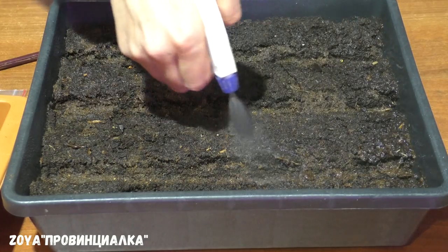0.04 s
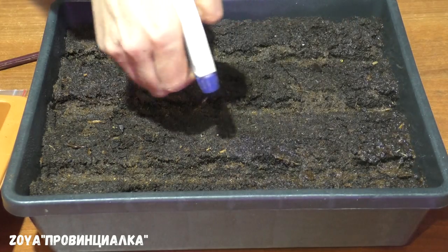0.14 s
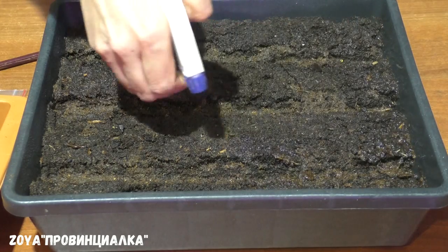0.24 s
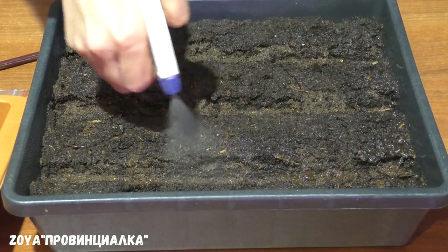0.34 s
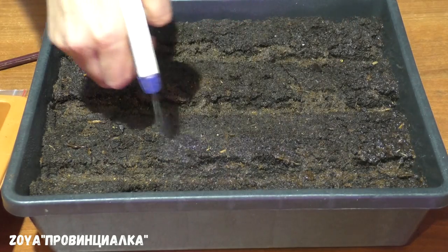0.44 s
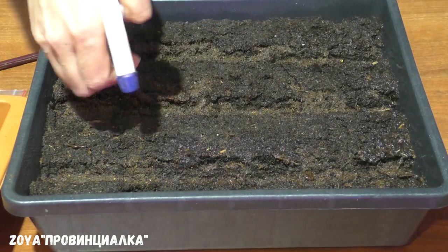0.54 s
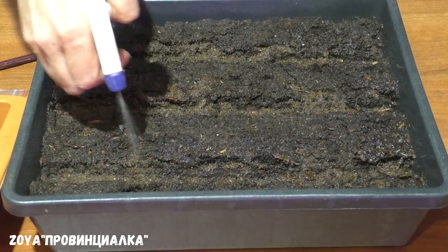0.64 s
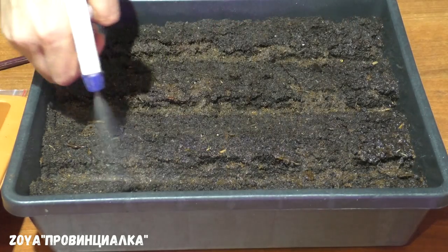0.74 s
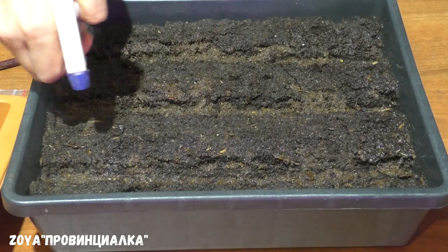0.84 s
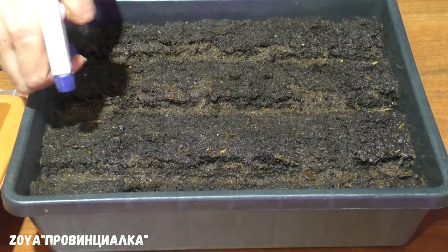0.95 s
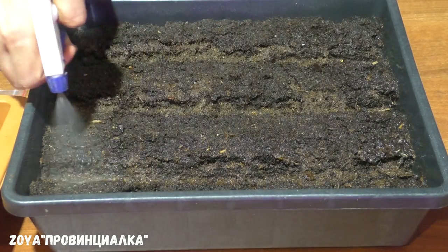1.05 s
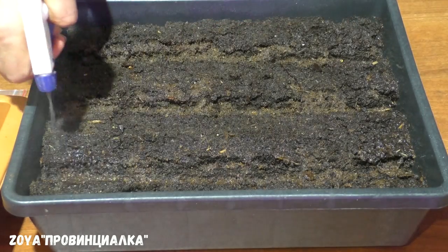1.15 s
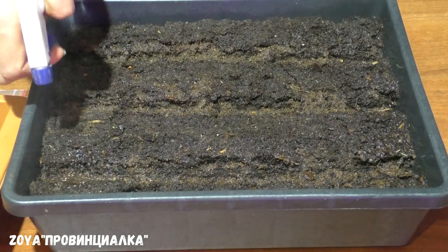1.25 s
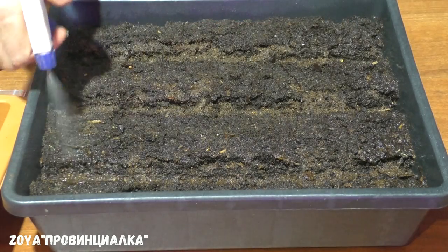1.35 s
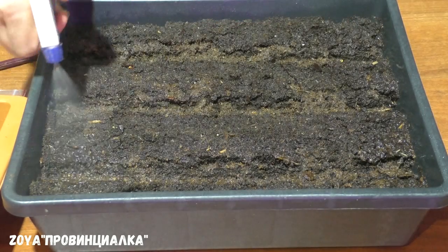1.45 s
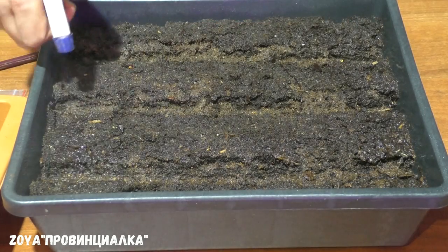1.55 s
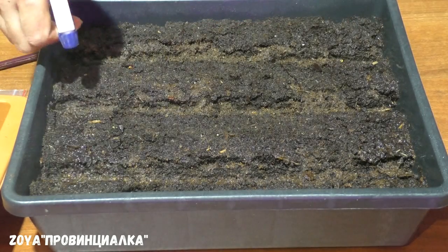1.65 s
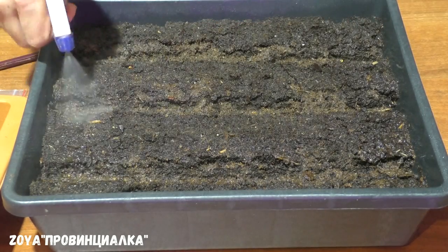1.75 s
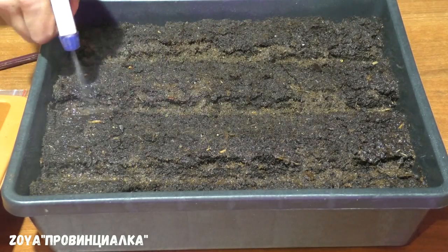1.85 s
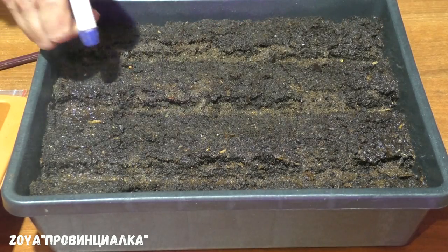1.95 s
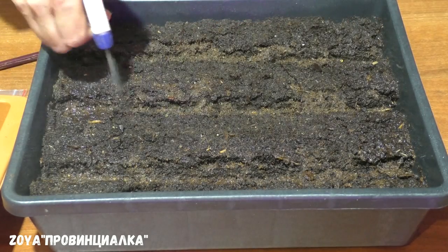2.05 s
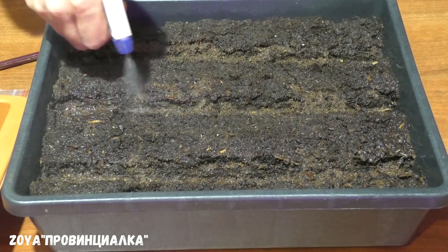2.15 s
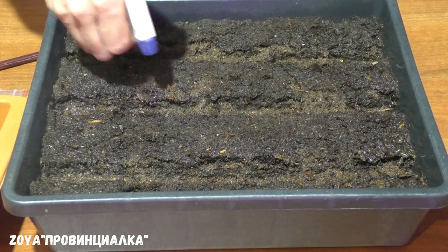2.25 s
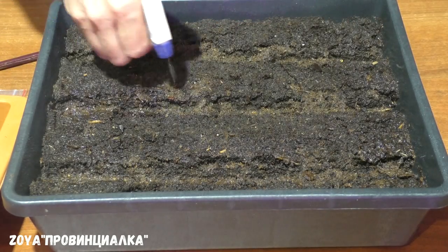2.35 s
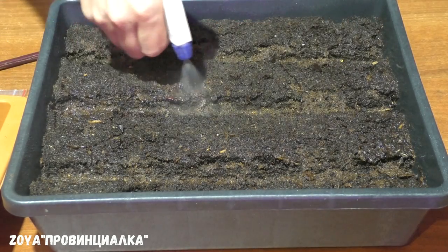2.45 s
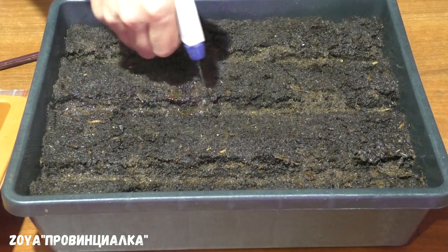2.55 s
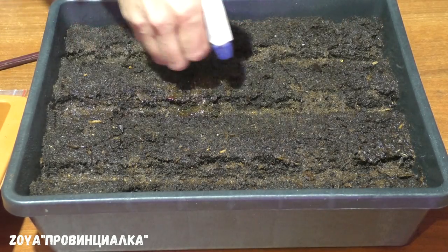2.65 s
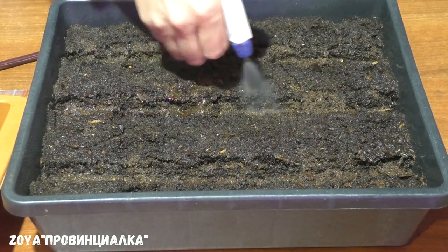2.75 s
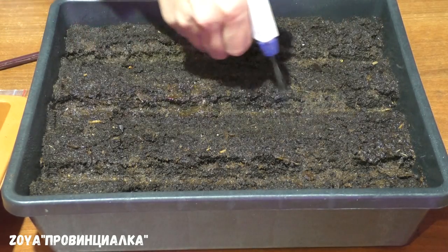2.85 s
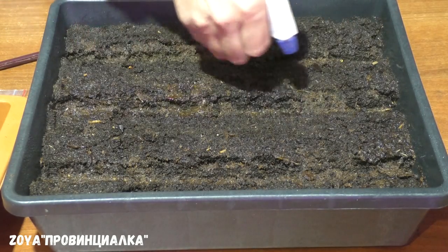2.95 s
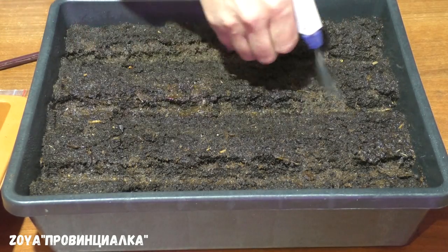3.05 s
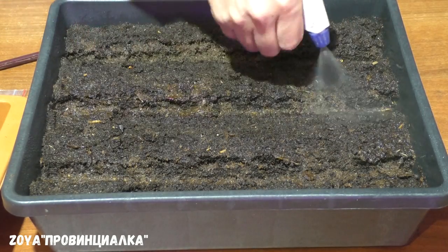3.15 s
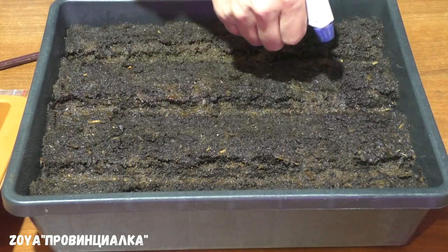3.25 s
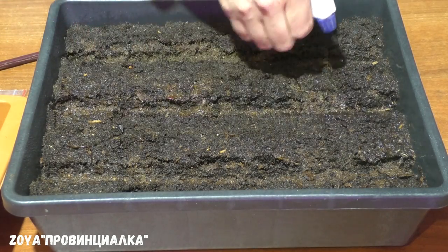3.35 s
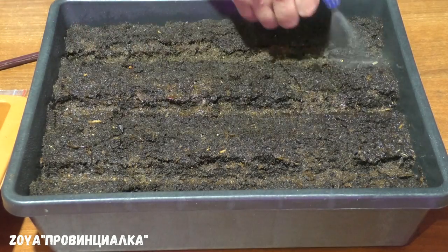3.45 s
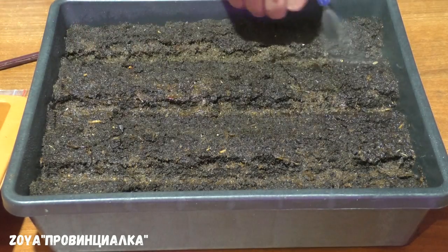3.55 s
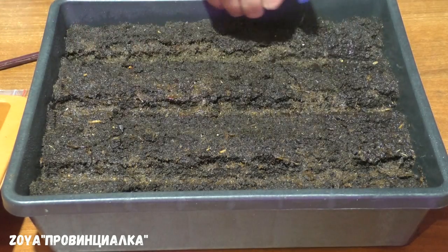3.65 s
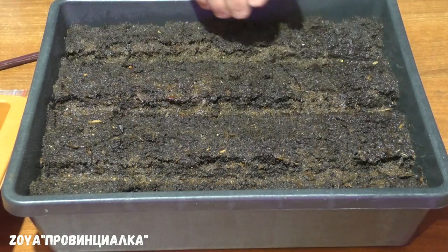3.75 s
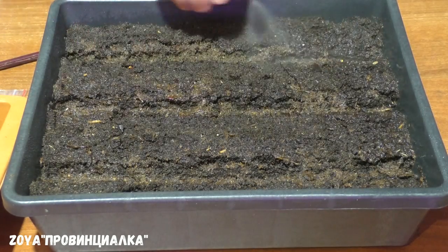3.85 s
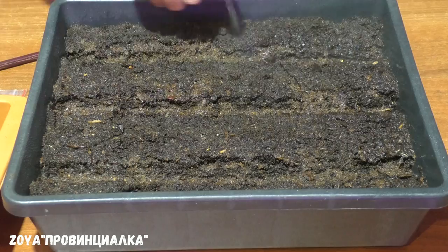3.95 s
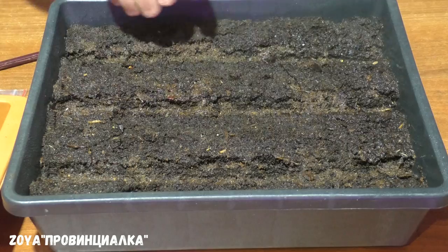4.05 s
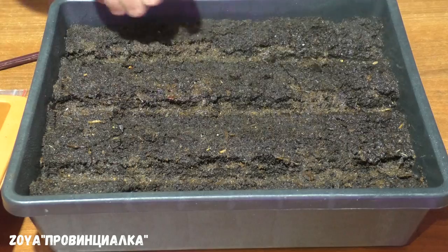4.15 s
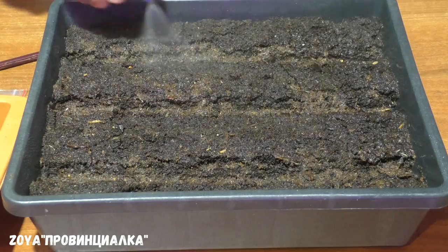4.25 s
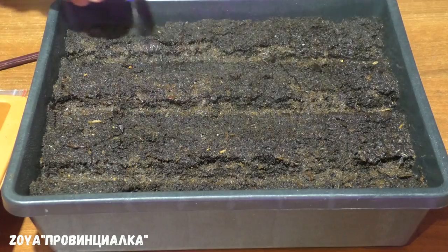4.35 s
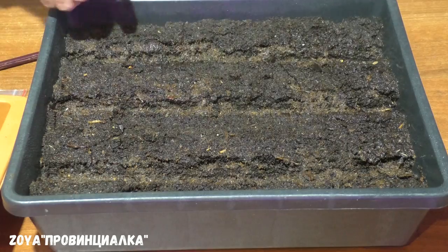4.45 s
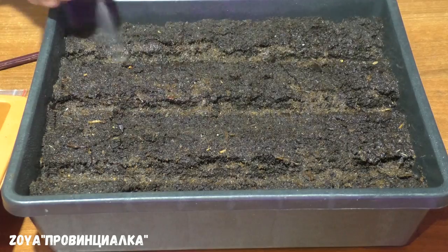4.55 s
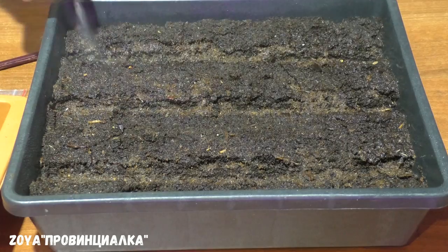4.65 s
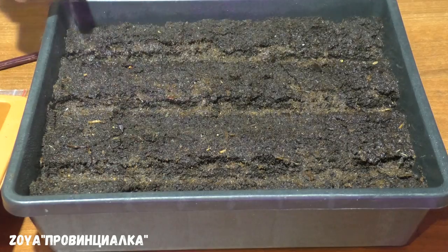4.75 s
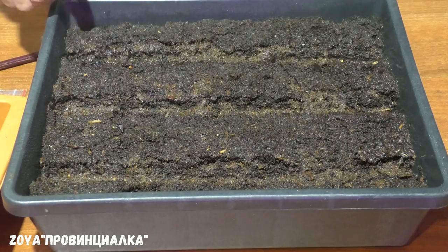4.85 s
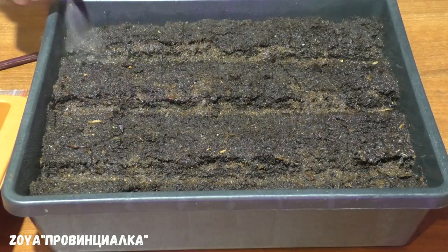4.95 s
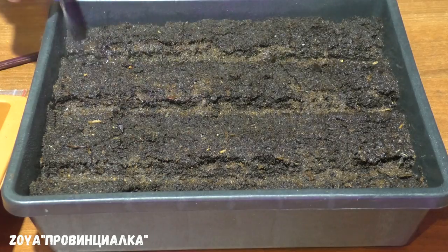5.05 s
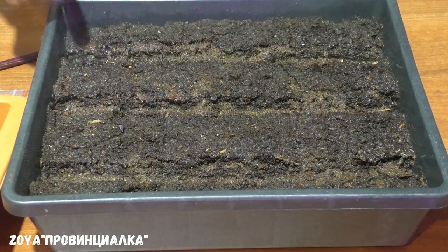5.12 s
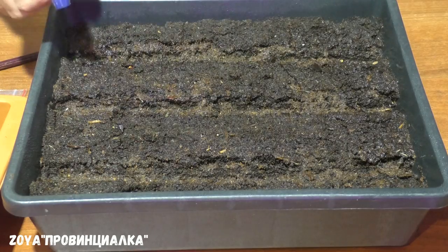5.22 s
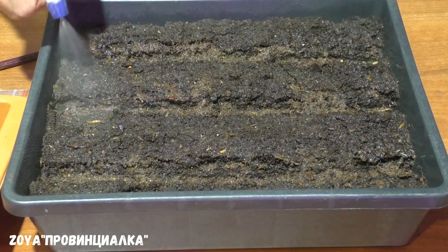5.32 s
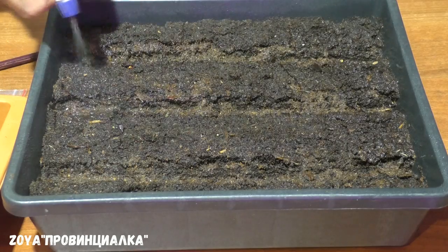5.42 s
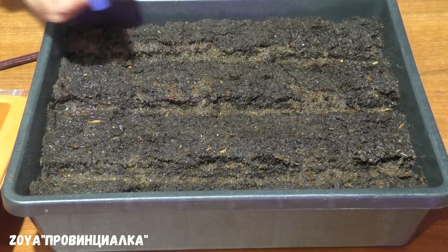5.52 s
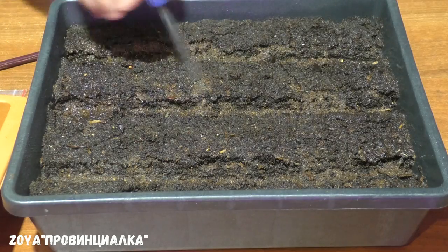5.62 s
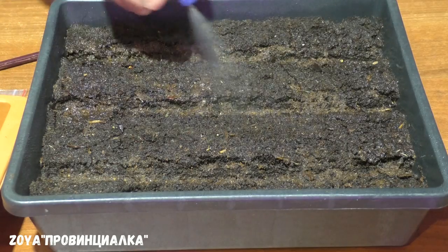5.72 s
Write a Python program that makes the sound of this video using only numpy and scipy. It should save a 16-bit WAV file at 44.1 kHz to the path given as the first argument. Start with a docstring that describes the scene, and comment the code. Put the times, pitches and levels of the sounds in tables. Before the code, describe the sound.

A plastic trigger spray bottle is pumped steadily, close to the microphone, in a small quiet room for about six seconds. At 0 s a squirt is already under way, fading by 0.15 s with a small tick as the trigger springs back. New squeezes follow at about 0.3, 0.65, 1.0, 1.35, 1.7 and 2.05 s, continuing every third of a second or so until the last at 5.63 s. Each starts with a crisp plastic snap, then a bright, slightly sputtering hiss with a rougher nozzle rush, dying within about 0.2 s. Most carry a short, low hollow knock, strongest up to about 3 s. Between squirts come light irregular ticks and a grainy suction rustle, more noticeable after 3.6 s. From about 4.5 s the snaps and knocks are generally softer and the sprays slightly weaker. Brief dry echo and faint steady noise surround everything.

```python
"""A hand pumps a trigger spray bottle about three times a second in a quiet room.
Each squeeze snaps the valve open and hisses mist out of the nozzle: shaped noise that follows the pressure.
Most squeezes also knock the hollow body, a short low ring. The trigger springs back with small plastic ticks,
bursts of tiny impacts into ringing modes, while the pump sucks up more water with a grainy rustle.
A short room echo and a steady faint noise lie around it all."""
import sys
import numpy as np
from scipy import signal
from scipy.fft import rfft, irfft
from scipy.io import wavfile
from scipy.ndimage import uniform_filter1d

SR = 44100
rng = np.random.default_rng(int(sys.argv[2]) if len(sys.argv) > 2 else 0)


def to_wav(s):
    """Save 16-bit WAV."""
    ch = np.atleast_2d(s).T  # columns
    pcm = np.round(np.clip(ch, -1, 1) * 32767)  # PCM
    wavfile.write(sys.argv[1], SR, pcm.astype(np.int16))


def volts(x):
    """Linear amplitude factor 10**(x/20) for a level x in dB, scalar or array-like."""
    e = np.asarray(x, float) / 20
    return 10 ** e


N = 254898  # length in samples

# The squeezes. Each row: start in seconds, full pressure in seconds, mist level in dB,
# how much softer the mist is 60 ms before full pressure in dB, time to lose 20 dB after it in seconds.
SQUEEZES = [(0.0, 0.026, -38, -4, 0.1108), (0.296, 0.377, -37.5, 6, 0.1037),
            (0.643, 0.717, -39.5, 0.5, 0.1233), (0.983, 1.061, -38.5, 5, 0.131),
            (1.346, 1.426, -38.5, -2, 0.1175), (1.693, 1.772, -37.5, 4, 0.1223),
            (2.038, 2.101, -39.0, 2, 0.1362), (2.373, 2.44, -38, 4.5, 0.1311),
            (2.725, 2.832, -38, 1, 0.0618), (3.075, 3.143, -37, 10, 0.1331),
            (3.447, 3.508, -38.5, 8.5, 0.1461), (3.808, 3.873, -37.5, 16, 0.1226),
            (4.179, 4.246, -38, 14, 0.1517), (4.538, 4.602, -39, 17.5, 0.1524),
            (4.907, 4.97, -40, 22, 0.1408), (5.261, 5.312, -40, 45, 0.1584),
            (5.628, 5.696, -40.5, 14, 0.113)]
# The valve snaps open and bounces once. Each row: time in seconds, level in dB, added ring in Hz,
# bounce level relative to the snap in dB.
VALVE_SNAPS = [(0.2999, -17.5, 2700, -5.5), (0.653, -14.5, 1130, -7.5), (0.9964, -18, 5000, 0),
               (1.355, -21, 3400, 2.5), (1.6978, -17.5, 3560, -5.5), (2.0477, -19, 3430, -1.5),
               (2.3785, -19, 3200, -6.5), (2.7342, -17, 3300, -21), (3.0812, -15.5, 3280, -25),
               (3.4533, -14.5, 3710, -33), (3.8144, -21, 3600, -26.5), (4.1846, -19, 2700, -28.5),
               (4.5442, -25.5, 5170, -28), (4.912, -27, 1260, -22), (5.2654, -21.5, 2044, -29.5),
               (5.63, -25.5, 1885, -10.5)]
# The released trigger springs back to its stop, touches twice, and the piston scrapes back.
# Each row: time in seconds, level in dB, added ring in Hz, second touch relative to the first in dB,
# scrape level before its rise and fade in dB.
TRIGGER_RETURNS = [(0.1457, -33.5, 1960, -7, -62), (0.5133, -32, 1800, -4.5, -67),
                   (0.8634, -32, 1750, -10, -54), (1.2034, -31.5, 1850, -6, -63),
                   (1.5628, -32, 1240, -9, -56), (1.914, -36, 2540, -1.5, -59),
                   (2.2522, -34, 2330, -6, -57), (2.5978, -34.5, 1980, -1.5, -58),
                   (2.9476, -33.5, 1950, -10, -59), (3.2982, -34.5, 1840, -7, -66),
                   (3.681, -37, 2930, -23, -48.5), (4.042, -39, 2840, -23, -46),
                   (4.423, -39, 3410, -25, -47), (4.7818, -35.5, 3300, -8.5, -41),
                   (5.1367, -40.5, 1570, 4.5, -48), (5.4896, -42.5, 1820, -12, -54)]


def evened(x):
    """Scales a sound to an rms (average strength) of 1."""
    return x / np.sqrt(np.mean(x ** 2) + 1e-20)


def read(points, hz):
    """Reads a table between its points, on a log-frequency axis."""
    f, value = np.transpose(points)
    return np.interp(np.log(hz + 1), np.log(f + 1), value)


def add(mix, s, sound):
    """Mixes a sound in, starting at s seconds."""
    part = mix[round(s * SR):][:len(sound)]
    part += sound[:len(part)]


def colour(x, spectrum):
    """Filters x by a table of Hz and dB, then scales it to rms 1."""
    hz = np.fft.rfftfreq(x.shape[-1], 1 / SR)
    return evened(irfft(rfft(x) * volts(read(spectrum, hz)), x.shape[-1]))


def jet():
    """Water torn into mist: a bright fizz that lingers and a lower nozzle roar that ends with the stroke."""
    # Colour of the fizz. Each row: frequency in Hz, level in dB per Hz.
    fizz_colour = [(2000, -28), (3500, -6), (7700, -4.5), (12000, -0.5), (15500, -12.5), (16500, -88)]
    # Colour of the roar. Each row: frequency in Hz, level in dB per Hz.
    roar_colour = [(100, -22), (300, -12.5), (600, -25), (860, -20), (1070, -4.5), (1700, -3.5), (2150, 0),
                   (3000, -3), (4500, -7), (8000, -14), (15600, -9)]
    hold = 0.29  # larger keeps the jet near full pressure for more of the fade
    t = np.arange(N) / SR
    mist, roar, spent = np.zeros((3, N))
    for opens, full, db, rise_db, fade in SQUEEZES:
        late = t[round(opens * SR):][:SR // 3] - full
        past = np.maximum(late / fade, 0)
        # pressure builds, holds for a moment, then bleeds away
        build_db = rise_db * (late / 0.06) ** 2
        bleed_db = 20 * past ** 3 / (hold + (1 - hold) * past ** 2)
        sag_db = np.where(late < 0, build_db, bleed_db)
        # the jet takes a moment to form; the first one is already running
        onset = np.minimum((late - late[0]) / 0.012, 1) ** 2 if opens else 1
        add(mist, opens, onset * volts(db - sag_db))
        add(spent, opens, np.minimum(past, 1))
        # a slower fade roars more, and the roar follows pressure more steeply
        roar_db = db - 2 + 27 * fade - np.where(late < 0, 1.6, 1.3) * sag_db
        # it drops ahead of the mist when the piston bottoms out
        roar_db -= 2.3 * np.clip((late - 0.5 * fade) / 0.03, 0, 1)
        add(roar, opens, onset * volts(roar_db))
    flutter = evened(uniform_filter1d(rng.standard_normal((2, N)), size=200))
    # about 1500 single spits a second, of random strength
    spit = volts(1.6 * rng.exponential(1, N)) * (rng.random(N) < 1500 / SR)
    # the jet swells in lumps, and breaks up into gulps and spits as the pressure runs out
    slow_noise = uniform_filter1d(rng.standard_normal((2, N)), size=600)
    lumps = evened(uniform_filter1d(slow_noise, size=600))
    sputter_db = (np.array([[0.6], [1.4]]) + 1.1 * spent) * lumps
    unevenness = volts(0.38 * flutter + sputter_db) + (0.74 + spent) * spit
    fizz, rush = rng.standard_normal((2, N)) * unevenness
    misty = uniform_filter1d(mist, size=200) * colour(fizz, fizz_colour)
    return misty + uniform_filter1d(roar, size=200) * colour(rush, roar_colour)


def room(x):
    """Room echo: sparse taps of random sign, each band dying at its own speed, different at each ear."""
    # How fast the echo dies. Each row: frequency in Hz, time to fall 60 dB in seconds.
    echo_fade = [(250, 0.18), (2000, 0.061), (14000, 0.067)]
    size = SR // 2
    taps = np.zeros((2, size))
    # one tap somewhere in every 20 samples
    at = np.arange(150, size - 20, 20) + rng.integers(0, 20, (2, (size - 151) // 20))
    np.put_along_axis(taps, at, rng.choice([-1., 1.], at.shape), 1)
    hz, t, bands = signal.stft(taps, SR, nperseg=256)
    fading = volts(-60 * t / read(echo_fade, hz)[:, None])
    tail = signal.istft(bands * fading, SR, nperseg=256)[1]
    return signal.fftconvolve(x[None], tail / np.linalg.norm(tail[0]), axes=1)[:, :N]


def air():
    """Steady faint noise of room and microphone, partly alike left and right."""
    # Colour of the noise. Each row: frequency in Hz, level in dB per Hz.
    noise_colour = [(25, -9.5), (270, 3), (600, -15), (1050, -1), (1900, 0), (3400, -2), (4500, -11.5),
                    (13000, -16.5), (16500, -37)]
    shared, left, right = rng.standard_normal((3, N))
    return volts(-57.5) * colour(shared + 2.6 * np.array([left, right]), noise_colour)


def contacts():
    """Lists every small plastic contact as (seconds, level in dB, ring in Hz)."""
    # Other small plastic ticks between squeezes, some of them extra touches of the returning trigger.
    # Each row: time in seconds, level in dB, added ring in Hz.
    small_ticks = [(0.2173, -34.5, 2850), (0.2705, -38, 2480), (0.5926, -40.5, 2740), (0.622, -43, 2230),
                   (0.9390, -35, 4100), (1.27, -43, 2200), (1.2825, -38.5, 4360), (1.32, -41, 2600),
                   (1.9953, -41, 1830), (2.2795, -41, 1760), (2.3272, -39, 4200), (2.68, -43.5, 3070),
                   (2.71, -48, 3020), (3.029, -48.5, 3880), (3.382, -41, 3140), (3.411, -48, 2480),
                   (3.7172, -34, 3440), (3.788, -43.5, 2520), (4.0512, -31.5, 3350), (4.166, -53, 2200),
                   (4.4036, -43, 1920), (4.4795, -41.5, 3360), (5.2228, -46.5, 3570), (5.503, -36.5, 5450),
                   (5.5336, -36.5, 3660), (5.557, -42, 3300), (5.582, -42.5, 3460)]
    rows = list(small_ticks)
    for (opens, *_), (s, db, hz, bounce_db) in zip(SQUEEZES[1:], VALVE_SNAPS):
        rows.append((opens, db - 18.5, 3140))  # the trigger takes up its slack with a softer tick
        rows.append((s, db, hz))
        rows.append((s + 0.0084, db + bounce_db, 2200))
    for s, db, hz, second_db, _ in TRIGGER_RETURNS:
        rows.append((s, db, hz))
        rows.append((s + 0.011, db + second_db, 3200))
    return rows


def ticks():
    """Each tick is a burst of tiny impacts into the plastic modes, plus one ring set by where it lands."""
    # Ringing modes of the plastic, before each tick varies them.
    # Each row: frequency in Hz, level in dB, time to fall 60 dB in seconds.
    modes = [(2200, 2, 0.003), (3360, -3, 0.018), (5200, -2, 0.004), (7040, 4.5, 0.001), (9890, 9, 0.0017),
             (12330, 0, 0.0035)]
    t, out, rows = np.arange(2000) / SR, np.zeros(N), contacts()
    chance = rng.standard_normal((len(rows), len(t) + 2 * len(modes)))
    for (s, db, hz), z in zip(rows, chance):
        # a short dense crackle of impacts, then a looser scatter
        noise = z[:len(t)]
        crackle = np.exp(-(t / 0.0025) ** 2)
        scatter = volts(-14 - 60 * t / 0.042) * abs(noise[::-1])
        chatter = noise * (crackle + scatter) * np.minimum(t / 0.00015, 1)
        # every tick shifts the modes a little in pitch and level
        bend, sway_db = z[len(t):].reshape(2, -1) * [[0.05], [3.5]]
        body = volts(1.5 - 60 * t / 0.028) * np.sin(2 * np.pi * hz * t)
        for (f, mode_db, t60), b, w in zip(modes, bend, sway_db):
            # harder contacts reach the high modes better
            hardness_db = 0.24 * (db + 35) * np.log2(f / 3000)
            ring = np.sin(2 * np.pi * f * (1 + b) * t)
            body += volts(mode_db + w + hardness_db - 60 * t / t60) * ring
        tick = signal.fftconvolve(chatter, body)[:len(t)]
        add(out, s, volts(db) * tick / abs(tick).max())
    return signal.sosfilt(signal.butter(2, 800, "high", fs=SR, output="sos"), out)


def suction(ticked):
    """Water and spring scrape in the pump after each tick and return, and die away: a grainy rustle."""
    # Colour of the rustle. Each row: frequency in Hz, level in dB per Hz.
    rustle_colour = [(600, -28.5), (1200, -6.5), (2300, 2), (3500, -3), (4500, -7), (9000, -13.5),
                     (16000, -15)]
    t = np.arange(SR // 4) / SR
    fade = np.exp(-1 / (0.0065 * SR))  # smooths the power over about 6.5 ms
    capped_power = np.minimum(ticked ** 2, volts(-76.5))  # loud ticks stir no more than this
    stir = volts(-2.0) * np.sqrt(signal.lfilter([1 - fade], [1, -fade], capped_power))
    for s, *_, scrape_db in TRIGGER_RETURNS:
        rise = 1 - np.exp(-t / 0.0079)
        add(stir, s, rise * volts(scrape_db - 60 * t / 0.27))
    clumps_db = 3.0 * np.minimum(rng.exponential(1, N // 150 + 1), 3).repeat(150)[:N]
    grains = rng.standard_normal(N) * volts(uniform_filter1d(clumps_db, size=100))
    return stir * colour(grains, rustle_colour)


def blows():
    """Lists every knock of the body, and a lighter jolt where the valve snapped a moment earlier."""
    # The piston knocks the hollow body. Each row: time in seconds, level in dB,
    # pitch in Hz before a downward glide, starting level of the lingering ring in dB.
    body_knocks = [(0.27, -47.5, 257, -3), (0.314, -32, 270, 5), (0.671, -28.5, 244, 3),
                   (1.011, -30.5, 259, 3.5), (1.366, -38.5, 284, 8), (1.71, -26, 263, -16),
                   (2.063, -29.5, 267.4, 2.5), (2.387, -39.5, 271, 4), (2.737, -29, 284, -13),
                   (3.082, -33, 296, -7), (3.454, -42.5, 323, -7), (3.822, -39, 261, 0.5),
                   (4.186, -31.5, 289, -12.5), (4.925, -50, 222, -3), (5.267, -42.5, 247, 2),
                   (5.557, -54, 260, 0)]
    jolts = []
    for s, db, _, ring_db in body_knocks:
        for snap, *_ in VALVE_SNAPS:
            if 0.008 < s - snap < 0.03:
                jolts.append((snap, db - 10, 295, ring_db))
    return list(body_knocks) + jolts


def knocks():
    """The air and wall of the bottle ring a few cycles, damped ever faster by the gripping hand."""
    t, out = np.arange(5000) / SR, np.zeros(N)
    for s, db, hz, ring_db in blows():
        thump = np.exp(-(t / 0.0095) ** 3)
        linger = volts(ring_db - 60 * t / 0.086)
        swell = (1 - np.exp(-t / 0.0012)) * (thump + linger)
        # the pitch glides down
        add(out, s, volts(db) * swell * np.sin(2 * np.pi * hz * t * (1.03 - 2.67 * t)))
        # a softer, higher wall mode
        wall = np.minimum(t / 0.00026, 1) * np.sin(2 * np.pi * 430 * t)
        add(out, s, volts(db - 20.5 - 60 * t / 0.18) * wall)
    return signal.sosfilt(signal.butter(4, 112, "high", fs=SR, output="sos"), out)


def scene():
    """The bottle near the middle, its room echo and the steady noise."""
    ticked, knocked = ticks(), knocks()
    bright = jet() + ticked + suction(ticked)
    # the trigger sits beside the nozzle: its ticks reach the right ear a little later
    lean = 0.27 * (ticked - np.roll(ticked, 2)) * np.array([[1], [-1]])
    # the knock fills the room less than the hiss and ticks do
    echo = volts(-7.5) * room(bright + volts(-12.5) * knocked)
    return bright + knocked + lean + echo + air()


def top_cut(x):
    """Nothing passes above the cut-off."""
    return signal.sosfilt(signal.butter(12, 16820, fs=SR, output="sos"), x)


def record(dry):
    """Two close microphone ports: the top is cut, and the left-right difference is weakest in the treble."""
    # Top of the band. Each row: frequency in Hz, gain in dB.
    band_edge = [(15700, 0.11), (16150, -45)]
    # Stereo width. Each row: frequency in Hz, gain of the left-right difference in dB.
    side_gain = [(60, 3), (200, -3), (320, 1), (600, -4.5), (4500, -4), (6500, -14)]
    hz = np.fft.rfftfreq(N, 1 / SR)
    dry = irfft(rfft(dry) * volts(read(band_edge, hz)), N)
    mid, side = dry.mean(0), (dry[0] - dry[1]) / 2
    side = irfft(rfft(side) * volts(read(side_gain, hz)), N)
    return top_cut(np.array([mid + side, mid - side]))


dry = scene()
out = record(dry)
to_wav(out)
```